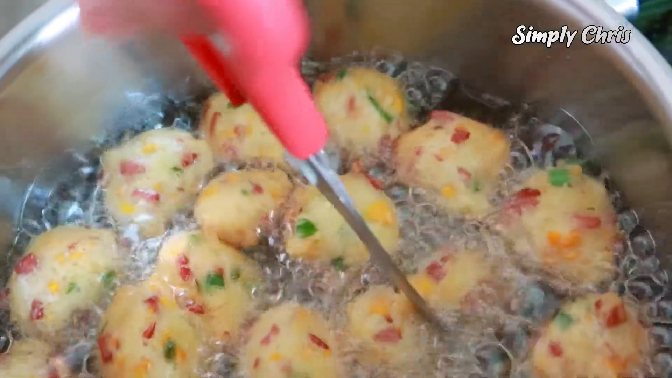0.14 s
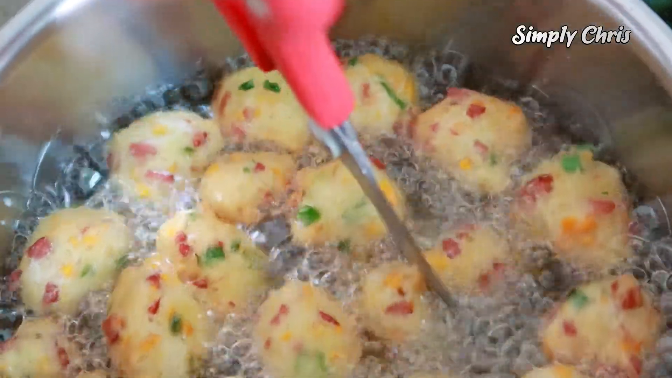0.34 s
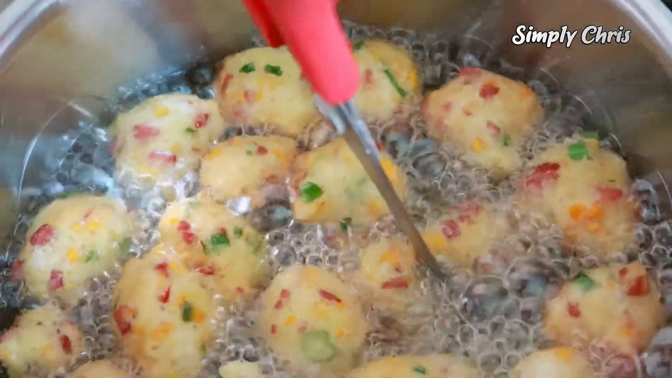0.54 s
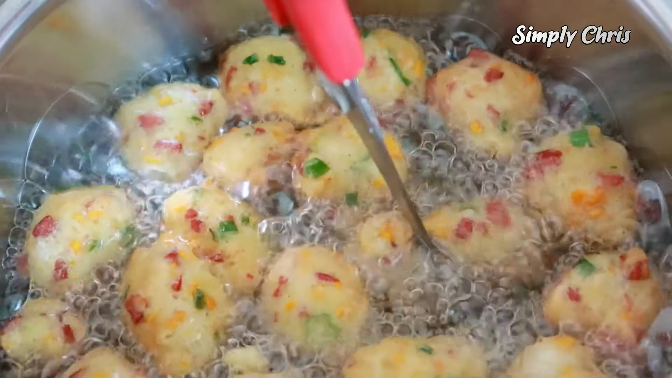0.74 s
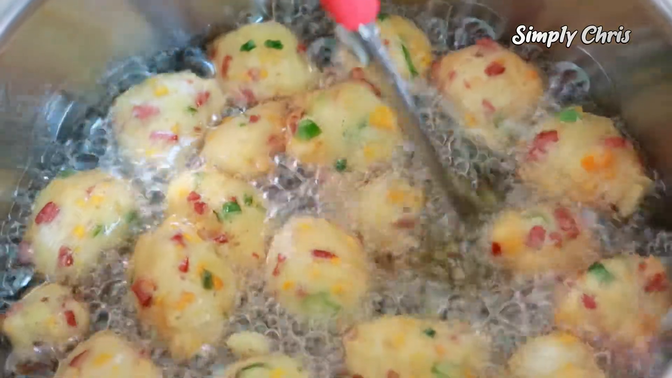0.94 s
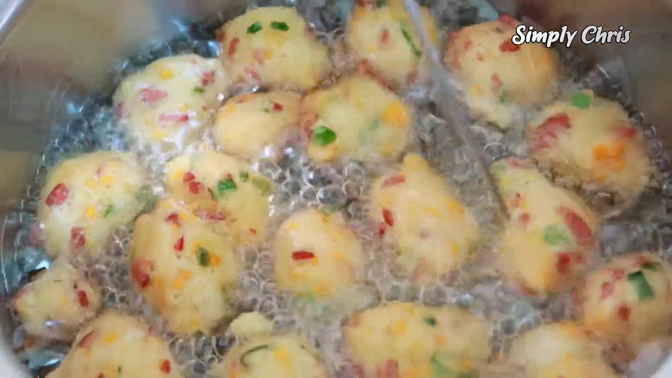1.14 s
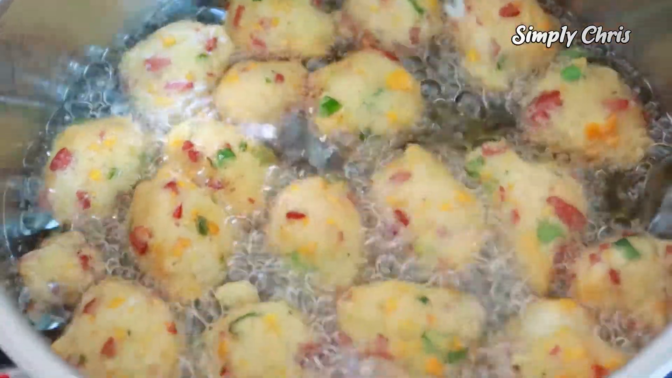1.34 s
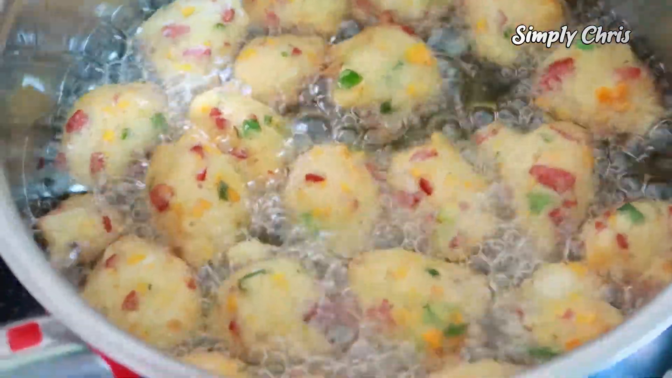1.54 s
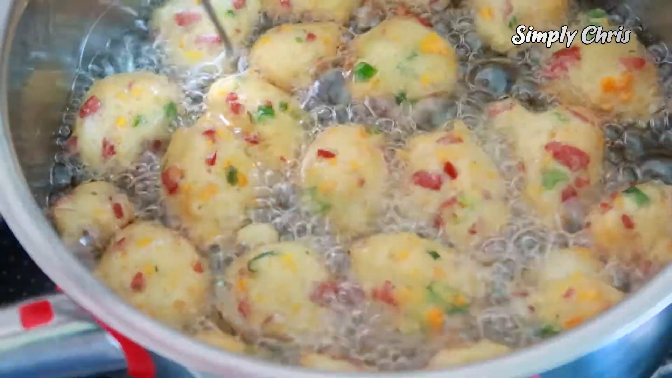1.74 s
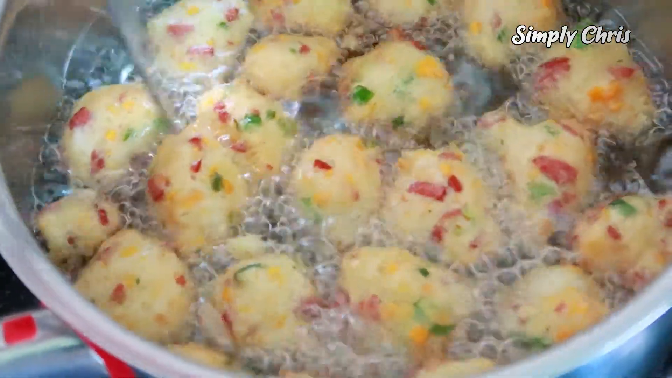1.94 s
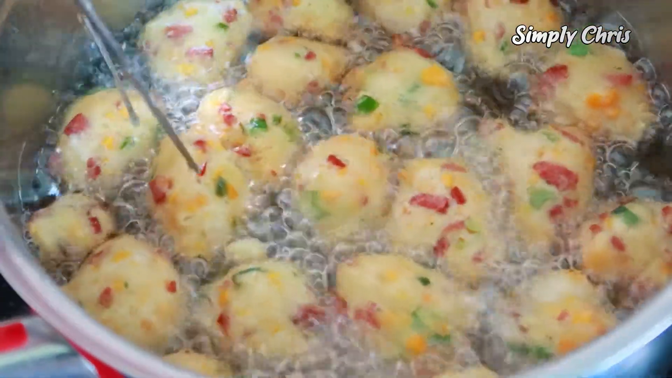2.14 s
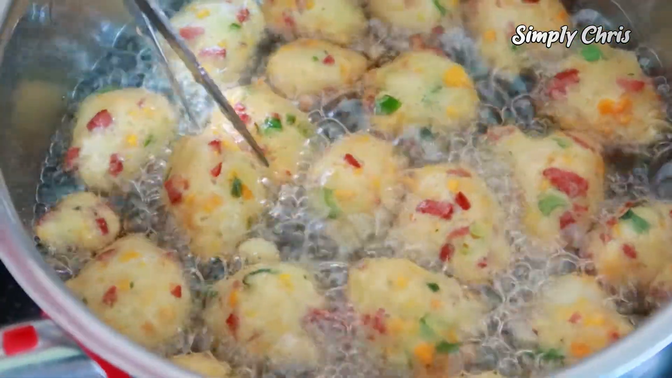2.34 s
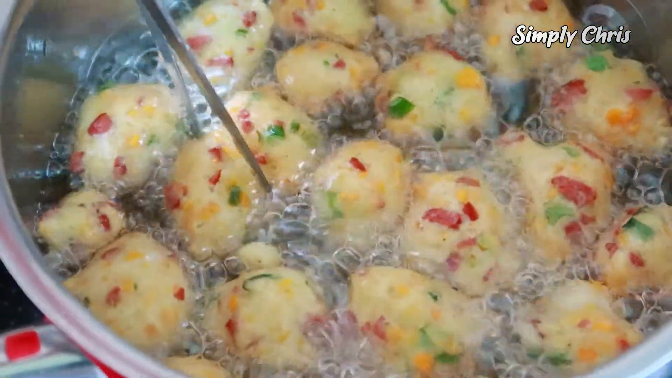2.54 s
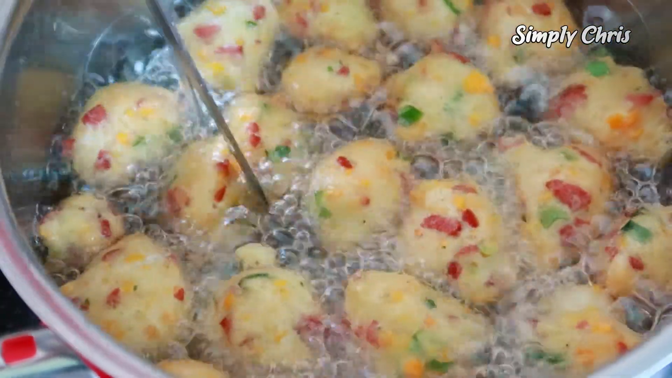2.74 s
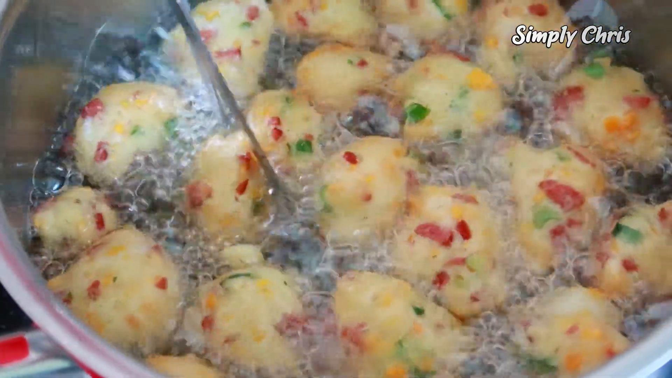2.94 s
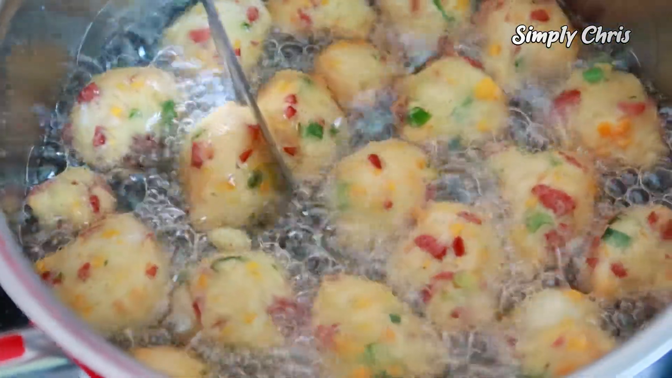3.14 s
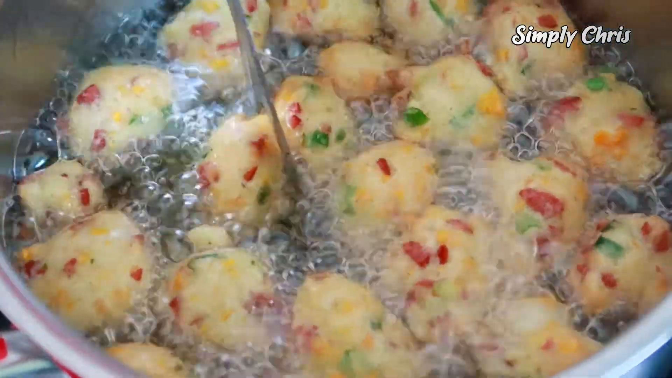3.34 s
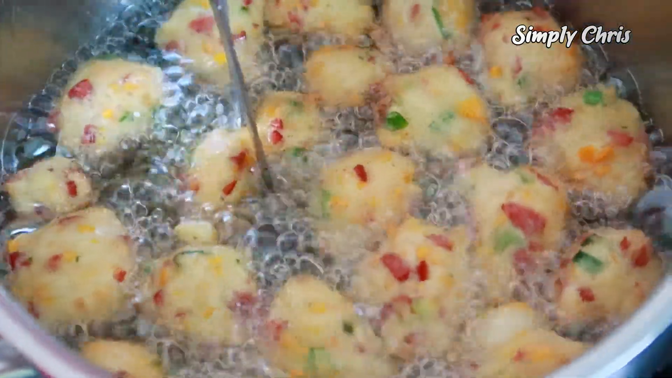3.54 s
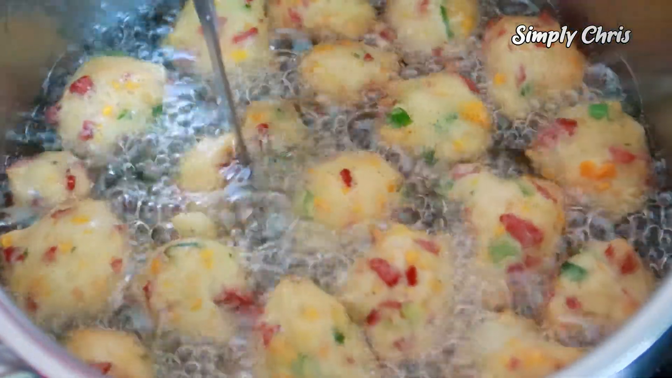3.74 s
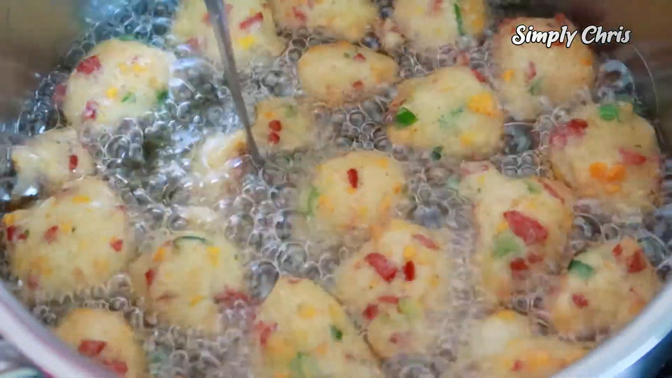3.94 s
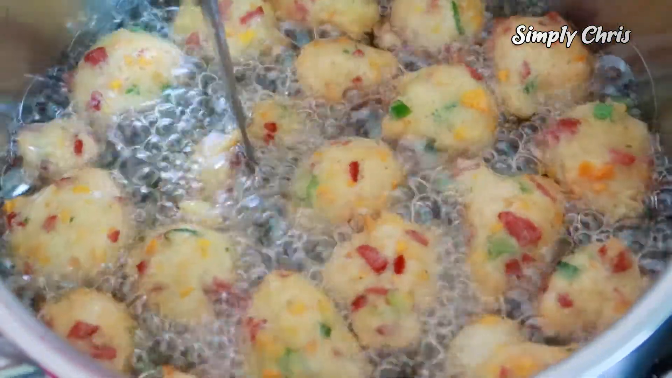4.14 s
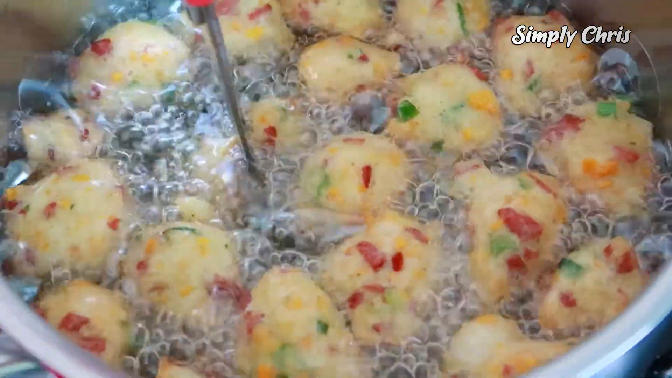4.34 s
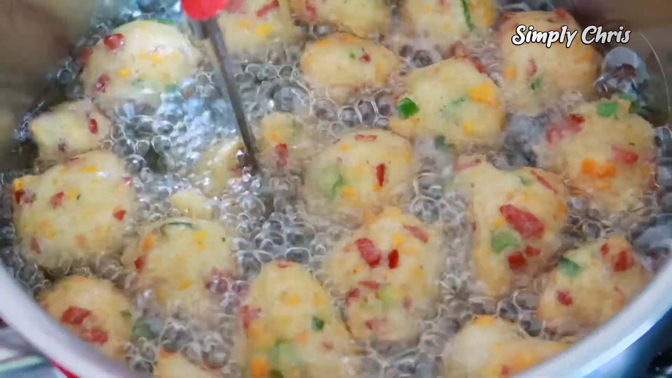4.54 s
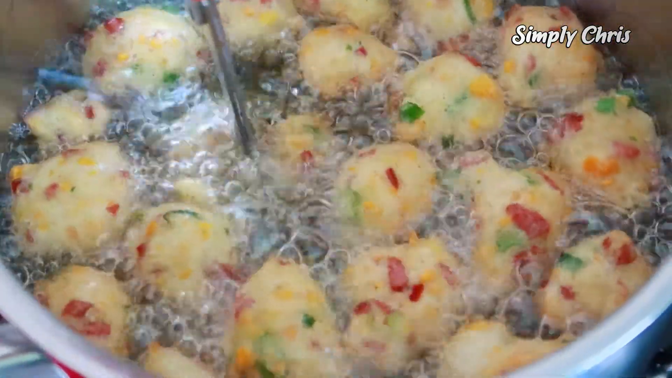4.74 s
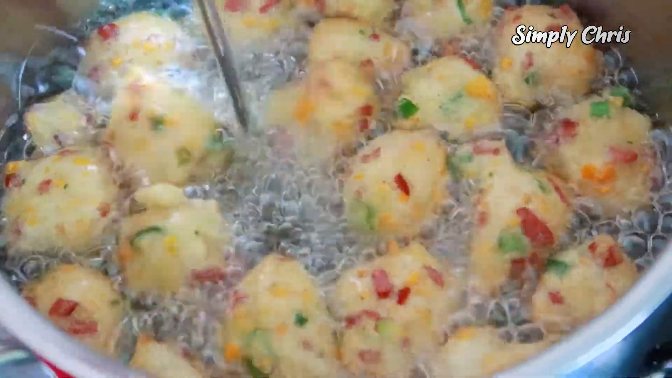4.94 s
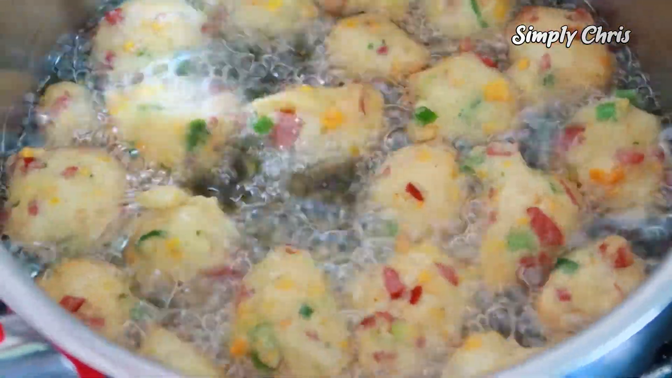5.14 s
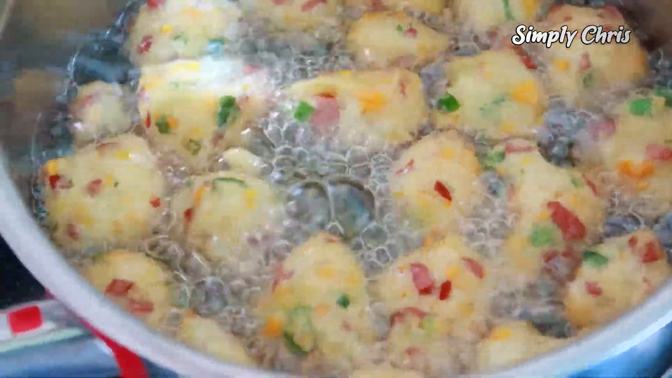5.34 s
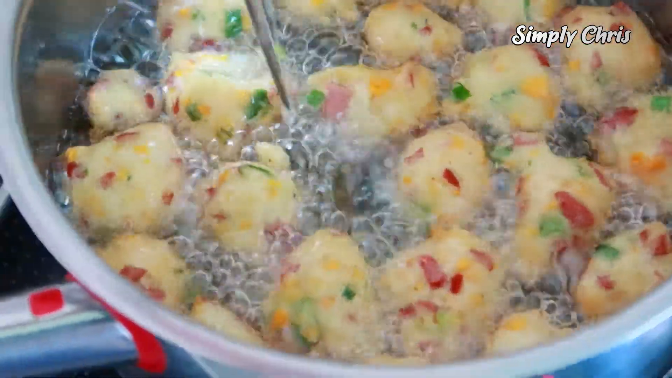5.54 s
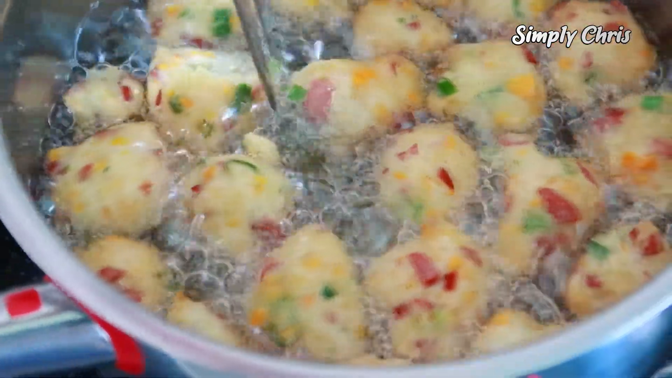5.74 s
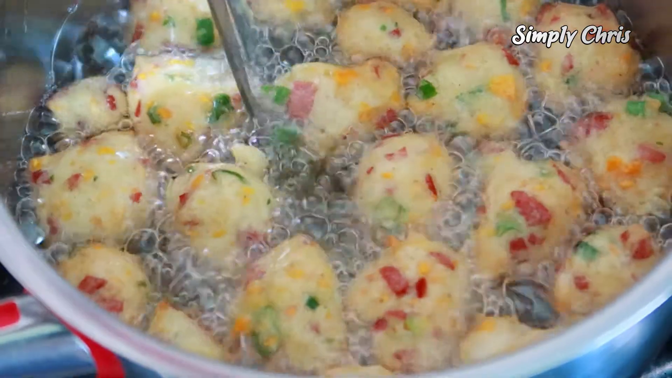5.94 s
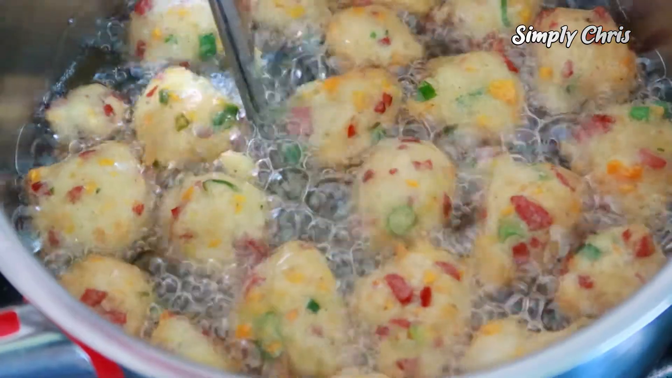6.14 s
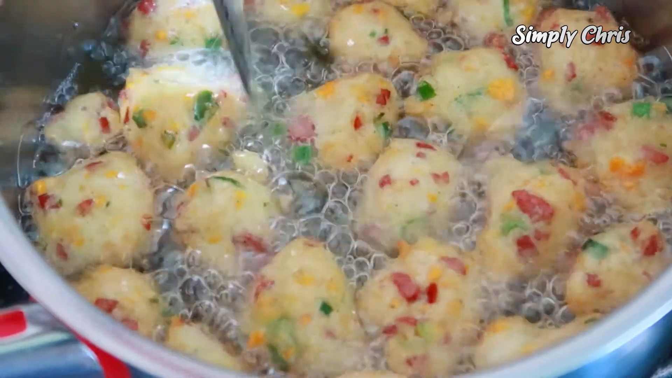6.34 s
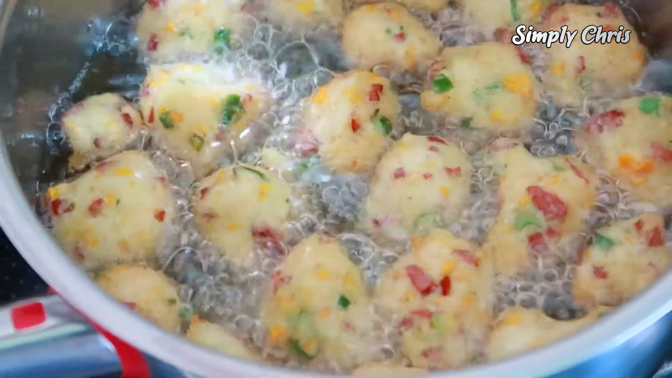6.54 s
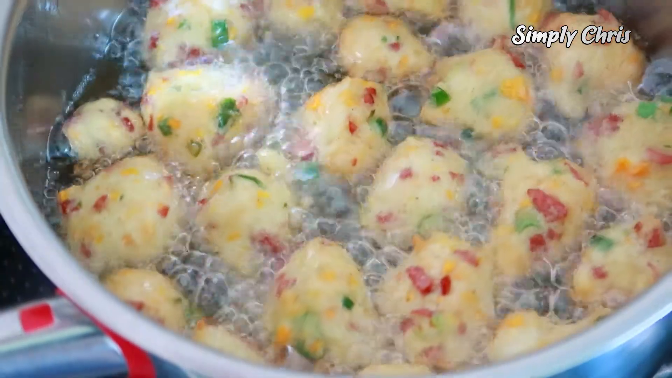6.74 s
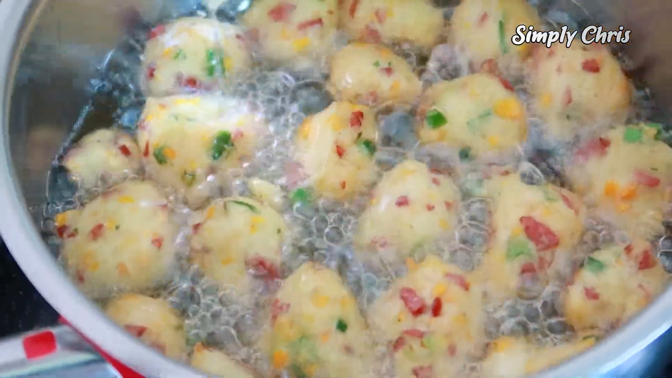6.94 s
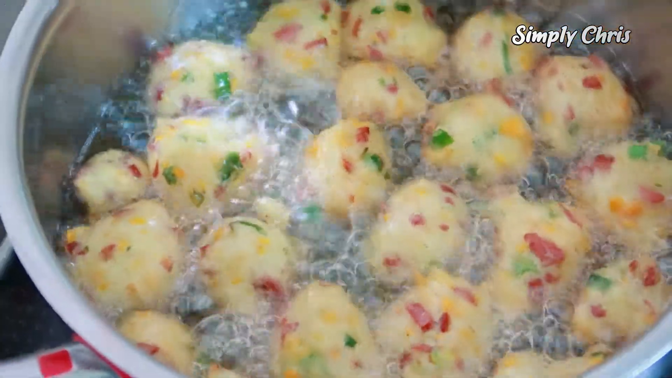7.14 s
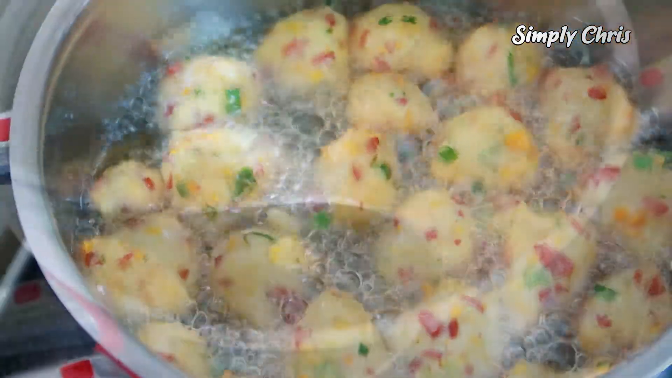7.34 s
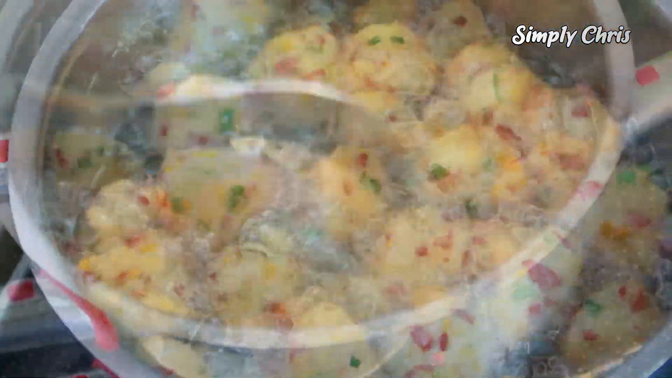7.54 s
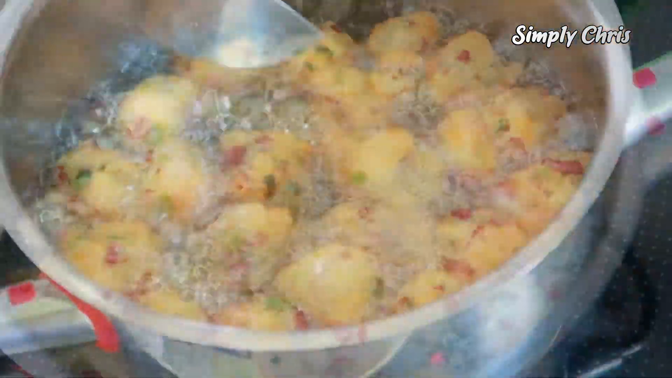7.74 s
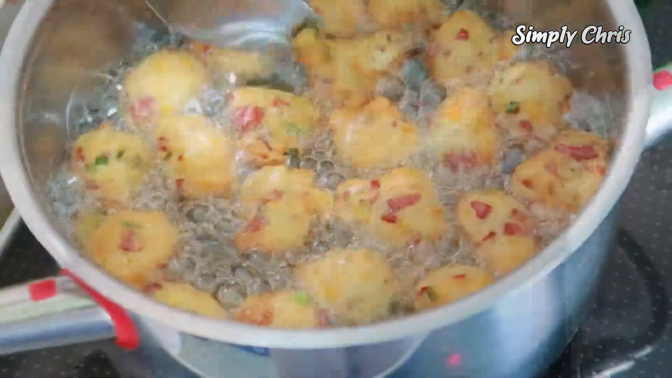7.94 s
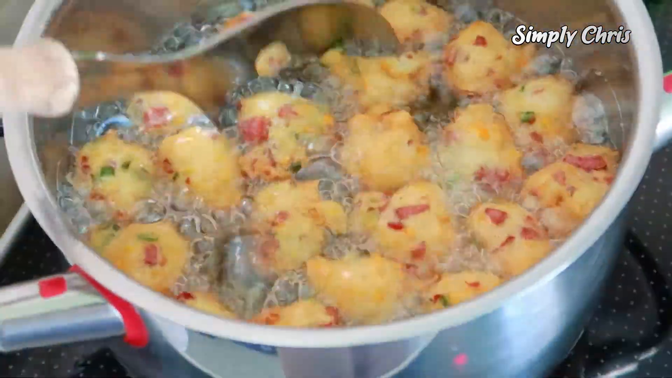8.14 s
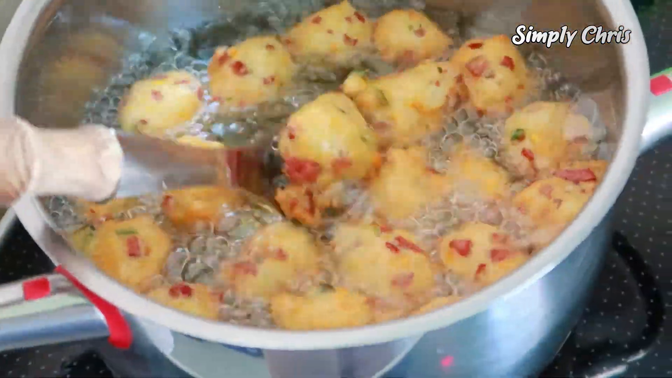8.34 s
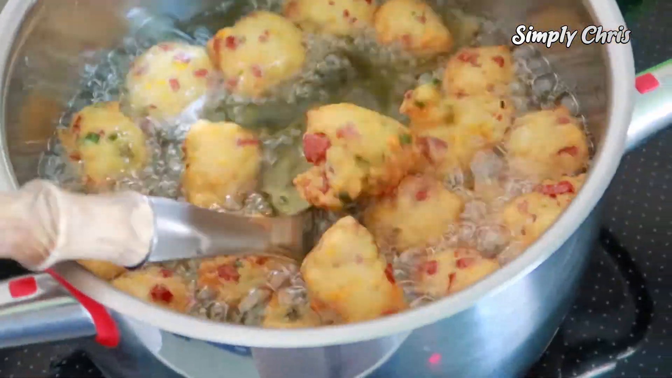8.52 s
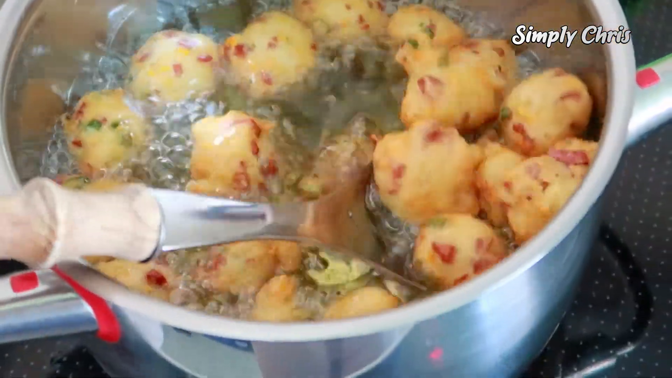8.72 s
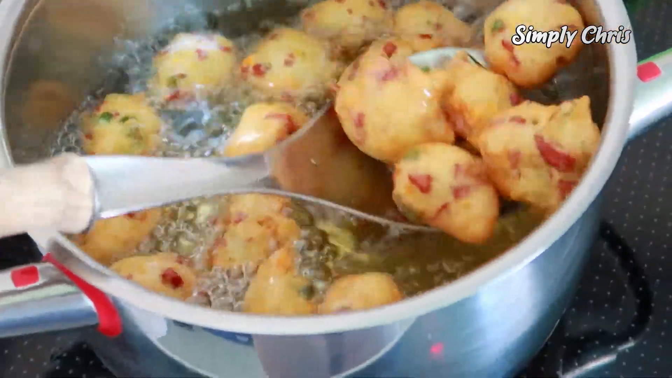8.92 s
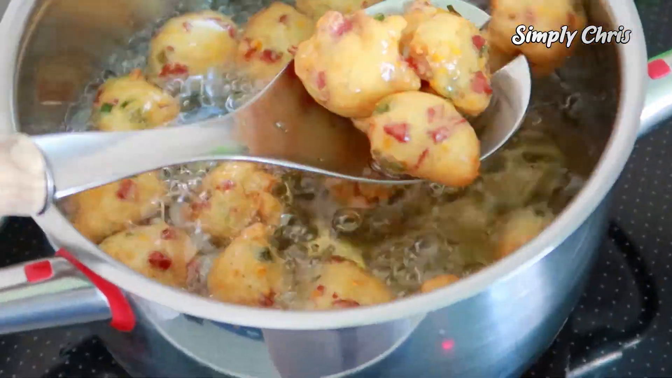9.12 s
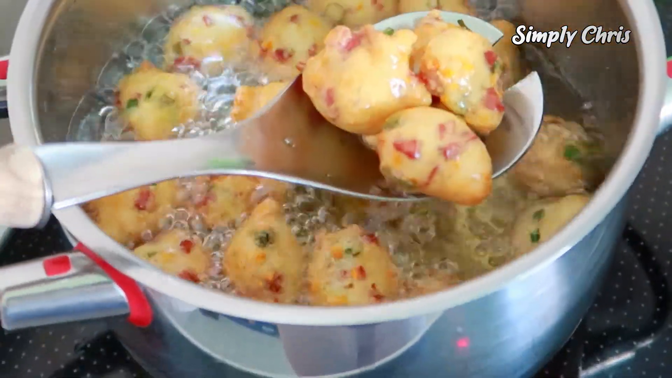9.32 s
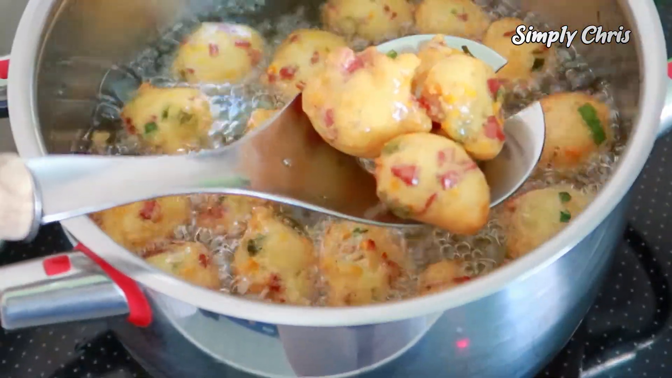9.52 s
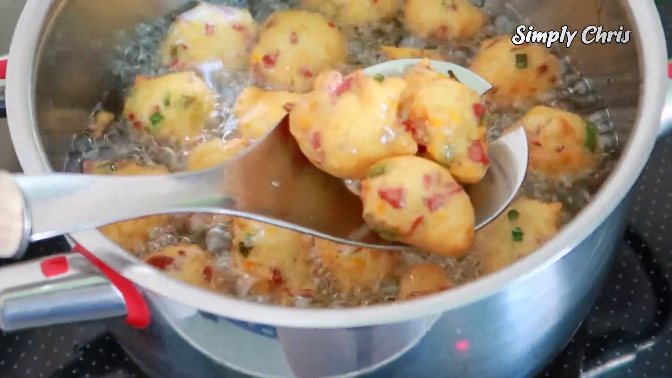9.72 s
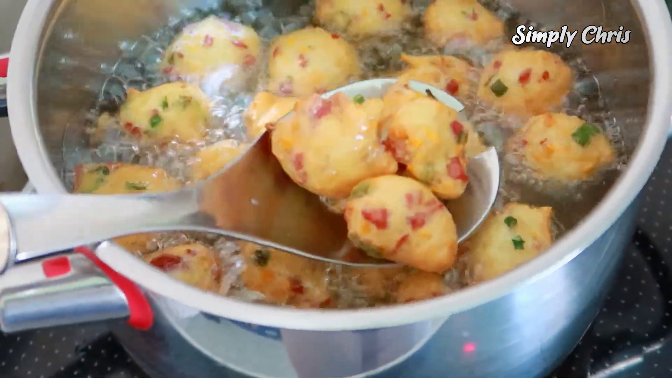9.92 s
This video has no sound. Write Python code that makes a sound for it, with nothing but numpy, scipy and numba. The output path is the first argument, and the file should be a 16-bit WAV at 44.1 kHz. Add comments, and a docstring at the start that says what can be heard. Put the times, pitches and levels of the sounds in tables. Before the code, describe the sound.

Close, constant frying fizz over a dull fan rumble, broken by small clicks, a few crisp bursts, and one loud pot clank near the end.

```python
"""Tools knock a steel pot, now and then throughout, over the sizzle of dough balls frying in hot oil.
Each knock rings the pot, thuds dully and stirs up a splash; the hob and worktop add a short rumble.
Steam bubbles fizz as thousands of tiny rings, with single blips, spitting droplets and popping water pockets.
Behind them a kitchen fan roars as shaped noise and hums. A small stereo microphone is close by."""
import sys
import numpy as np
from scipy import signal
from scipy.fft import rfft, irfft
from scipy.io import wavfile
from scipy.ndimage import uniform_filter1d, minimum_filter1d
from numba import njit

SR = 44100
rng = np.random.default_rng(int(sys.argv[2]) if len(sys.argv) > 2 else 0)


def dump(signal):
    """Clip the signal to [-1, 1] and save it as 16-bit WAV at the path in sys.argv[1]."""
    limited = np.clip(np.atleast_2d(signal).T, -1, 1)
    pcm = np.round(limited * 32767).astype(np.int16)
    wavfile.write(sys.argv[1], SR, pcm)


N = 440118  # samples
T = np.arange(N) / SR
HZ = np.maximum(np.fft.rfftfreq(N, 1 / SR), 1)

# Fan roar, its balance from low to high: f/Hz, relative level per Hz/dB
FAN_COLOUR = [(13, -55), (22, -38), (30, -31), (42, -2.5), (60, 4.5), (75, -6.5), (102, -3.5), (123, 0.5),
              (172, -4.5), (285, -4.5), (376, -2), (410, -2.5), (495, -7), (563, -16), (700, -12),
              (910, -12), (1540, -120)]
# Hum of the mains-driven fan motor: f/Hz, relative level/dB
MOTOR_HUM = [(50, -71), (58, -79), (100, -59), (150, -65.5), (200, -73.5), (299, -65)]
# Tool blows on the pot: t/s, relative level/dB, splash/dB, thud/dB, pitch struck hardest f/Hz,
# fall below that pitch/dB per octave, fall above it/dB per octave, weakest weighting of a mode/dB,
# share of the free ring time left by the tool resting on the pot, extra ring of the wall/dB
TOOL_BLOWS = [(0.019, -48, -34, -12, 450, 14, 6, -20, .5, 5),
              (0.042, -41, -38, -12, 430, 15, 5, -24, 0.54, 4),
              (0.064, -43.5, -33, -15, 600, 6, 9.9, -25, 0.65, 8.5),
              (0.425, -41, -31, 1, 940, 1.6, 7.2, -20, 0.47, 6),
              (0.777, -47, -28, -8, 460, 18, 5.5, -22, .4, 5),
              (0.797, -38.5, -34, -13, 460, 18, 4.6, -22, 0.4, 4.5),
              (0.822, -41.5, -27, -8, 470, 14, 8, -22, 0.63, 8),
              (0.832, -40, -28, 1, 950, 5, 7, -22, 0.25, 8),
              (0.846, -45, -23, -16, 473, 23, 7.1, -22, 0.52, 5),
              (0.873, -49, -15, -10, 1200, 6.5, 9, -22, 0.35, -3),
              (3.967, -35.5, -38, 6.5, 385, 11, 5.4, -35, 0.65, 1.5),
              (4.658, -45, -29, 4, 900, 2.7, 8, -22, 0.6, -8),
              (4.676, -48, -26, -2, 350, 5, 3.3, -22, 0.54, -8),
              (4.688, -47, -24, -3, 1000, 3, 6, -22, 0.44, -8),
              (4.732, -43, -28, -5, 1100, 14, 14, -21, 0.26, -5),
              (4.7746, -38, -25, 11, 230, 6, 4, -20, 0.74, -19),
              (4.785, -37.5, -31, 3, 220, 4.5, 5.1, -22, 0.78, -15),
              (8.304, -25.5, -42, -7, 204, 1, 9, -33, 0.87, 2.5),
              (8.717, -32, -23, -2, 1100, 2, 5.2, -13.5, 0.98, 1.5),
              (8.789, -44.5, -20, -10, 1000, 6.1, 2.4, -18, 0.48, -4),
              (8.818, -53, -30, -10, 900, 10, 10, -20, 0.47, -4),
              (9.109, -49, -32, -4, 1530, 5.8, 13, -13, 0.97, 3)]
# Ways the pot rings on its hob: f/Hz, relative level/dB, free ring time for a 60 dB fall/s
POT_MODES = [(96, -19, 0.16), (135.5, -7, 0.19), (198, -3, 0.21), (222, 4, 0.066), (281, -17, 0.17),
             (302, -5, 0.15), (378, -3, 0.15), (415, -1.5, 0.29), (455, -6.5, 0.089), (816, -5, 0.1),
             (895, 3.5, 0.077), (947, 0, 0.13), (1068, 0.5, 0.13), (1104, 2, 0.13), (1355, -0.5, 0.13),
             (1565, -2, 0.06), (1776, 0, 0.062), (2450, 13, 0.026), (3165, 12, 0.025), (4550, -27, 0.0079),
             (5940, 16, 0.037), (7250, 0, 0.014), (9200, 19.5, 0.018), (10000, -2, 0.01)]
# The tool strikes, chatters and rattles back: delay t/s, relative level/dB
TOOL_CONTACTS = [(0, -3.5), (.0007, -6.5), (.0024, -4.5), (.013, -20)]
# Dull body of tool and hand: f/Hz, relative level/dB, time for a 60 dB fall/s
DULL_BODY = [(112.4, -19.5, 0.29), (171, -3.5, 0.049), (210, 5, 0.058), (305, 3.5, 0.05), (588, 0.5, 0.065),
             (714, -2, 0.059), (1217, 6, 0.031), (1434, 8, 0.031)]
# Water pockets bursting: t/s, relative level of main ring/dB, left minus right/dB, splash/dB,
# coarsest splash f/Hz, finest splash f/Hz, low ring f/Hz, low ring/dB, main ring f/Hz,
# companion ring f/Hz, companion ring/dB, tilt of upper rings/dB per octave, sharpness of crack/dB, thump/dB
WATER_BURSTS = [(0.8981, -7, 3, -37.5, 800, 8100, 780, -8, 2350, 2930, -6, -2, 7, -33),
                (4.7732, -16.5, 2.5, -35.5, 870, 5040, 830, -5.5, 2370, 2700, -4, -3.5, 6.5, -18),
                (6.272, -15.5, 2, -34.5, 1000, 5800, 1160, -1, 2410, 2720, -3.5, 1, -13, -22),
                (8.9518, -20, 0, -29.5, 945, 10000, 930, -8, 1800, 2470, -23, 4.5, -3, -30)]
# Upper rings of a usual burst: f/Hz, relative level/dB, time for a 60 dB fall/s, share in the crack (1 = all)
BURST_UPPER_RINGS = [(4620, -1, 0.0083, 0), (7040, -5, 0.0065, 0.54), (7580, 4.5, 0.0031, 0.66),
                     (8360, -5, 0.0055, 0.69), (9650, -12.5, 0.014, 0.4), (11500, -13, 0.012, 0.23),
                     (13100, -5, 0.0024, 0.27)]
# Spitting droplets, and at 8.9592 s the bounce of the last burst:
# t/s, relative level/dB, middle pitch f/Hz, spread of pitch f/Hz, left minus right/dB
SPITS_AND_BOUNCE = [(1.108, -34, 3000, 2000, 0), (1.1275, -31, 12100, 2110, 1),
                    (2.755, -29.5, 9300, 5200, -3), (2.9431, -30, 10100, 3100, -1),
                    (3.3965, -25, 7700, 1500, 1), (3.6984, -33.5, 3500, 700, 2),
                    (3.7383, -29, 13000, 2800, 0), (3.857, -36, 4100, 1200, -1),
                    (4.0489, -34, 10600, 4100, 2), (4.438, -26.5, 6200, 4970, 1), (4.7, -34, 6900, 4000, 0),
                    (5.064, -33, 3020, 1000, 0), (5.0894, -30, 11800, 2400, -1), (5.17, -30, 3630, 2180, 0),
                    (5.678, -28, 8100, 3420, 2), (6.292, -34, 3820, 300, 0), (6.448, -28.5, 3900, 2800, 4),
                    (6.9942, -24, 3670, 4840, 7), (8.3301, -32, 6460, 4500, 0),
                    (8.9592, -19, 9100, 8160, 0), (9.28, -29, 2850, 2980, -2),
                    (9.3893, -28.5, 7400, 2010, -1)]
# Wet dough meeting the oil: t/s, relative level/dB, coarsest bubble f/Hz, finest bubble f/Hz, fade/s
DOUGH_FLURRIES = [(0.404, -61, 1800, 3500, 0.023), (1.108, -54.5, 2300, 4800, .12),
                  (1.235, -61, 2700, 3700, .03), (2.5, -60, 2770, 4000, 0.055),
                  (5.06, -58, 2600, 4000, 0.19), (6.551, -64, 2700, 3500, .2),
                  (9.282, -60.5, 1500, 4500, 0.033)]
# Levels of the frying and the fan over time; both dip near 7.67 s:
# t/s, fizz level/dB, boil (swell of mid-sized bubbles)/dB, level of the fan roar/dB, treble level/dB
FRYING_AND_FAN_LEVELS = [(0, 1.5, -1, 1, -2), (.3, 1, -1, -1, 1.5), (.75, 0, 0.5, 1, 1),
                         (1.05, 0, 4, 0, -0.5), (1.17, 0.5, -1.5, 1, 3), (1.45, 1.5, 2, 0.5, -1.5),
                         (1.8, 0.5, -2, 0, 4), (2.55, 0.5, 1, 0.5, 0.5), (3.4, 0.5, 0, 0.5, 1),
                         (4.3, 1, -1.5, 1, 2.5), (4.72, 0, -1.5, 2, 1.5), (5.16, 1.5, 2.5, 1, 0),
                         (5.6, 1.5, 2, 0.5, 1), (6.05, 0, -0.5, 1, 5), (6.85, 1, 2.5, 0.5, 0.5),
                         (7.18, 1, 0, 0, 1.5), (7.67, -1.5, -2, -1.5, -0.5), (8.1, 0, 0, 1, 0.5),
                         (8.4, 1, -1, 2, 0.5), (9.0, 1, -1, 0.5, 2.5), (9.98, 0, -3, -1.5, 2.5)]
# Fizz, its balance from low to high: f/Hz, relative level per Hz/dB
FIZZ_COLOUR = [(290, -30), (500, -6), (570, -20), (933, 3), (1050, -5), (1440, -5.5), (1550, -1.5),
               (1950, -5.5), (2810, -5.5), (3340, -7.5), (3810, -3.5), (6700, -9), (12700, -17),
               (14900, -27), (16000, -73)]
# Resonances of the air in the pot: f/Hz, width f/Hz, usual boost/dB
POT_AIR = [(1000, 103, 2.5), (1197, 18, 7.5), (1585, 120, 3), (2944, 113, 4.5), (3600, 100, 0.5)]

PORT_LAG_S = 4e-5  # lag between the two microphone ports for a place of 1
HOB_T60_S, HOB_DB = 0.3, -8
DROPS, DROP_SCATTER_DB = 1500, 1.8  # droplets in each splash, and how unevenly loud they are
SCATTER, SCATTER_PER_KHZ = 0.0024, 0.0356  # scatter of mode pitches, as fractions; it grows above 1 kHz
WALL_LOW_HZ, WALL_HIGH_HZ = 390, 490
USUAL_POP_HZ, FOLLOW = 2440, 0.63  # upper rings follow a pocket's pitch by this power
THUMP_HZ = 420
THUMP_T60_S, LOW_T60_S, MAIN_T60_S, TWIN_T60_S = 0.022, 0.01, 0.011, 0.0096
BLIPS, BLIP_DB, BLIP_PER_BOIL = 1200, -53.5, 1.4  # count, base level, dB for each dB of boil
BLIP_HZ, BLIP_SPREAD = 3124, 0.203  # middle pitch, and spread of its natural logarithm
BUBBLES = 400000
HOLLOW_WANDER_DB = 1.2
TILT_DB, TILT_PER_BOIL = 1, 1  # treble tilt at an even boil, and its rise for each dB of harder boil
FIZZ_DB, FAN_DB = -49, -50
TOP, SQUEEZE = 0.4, 0.25  # gain control: threshold amplitude, dB cut for each dB over it
HOLD_S, SLEW_S = 0.197, 0.0059
TOP_HZ = 15600


def undb(db):
    """Turn decibels into an amplitude factor."""
    return 10 ** (np.asarray(db) / 20)


def unit(x):
    """Scale a sound to an average (rms) strength of 1."""
    return x / np.sqrt(np.mean(x ** 2))


def colour(x, points, extra_db=0):
    """Shape a broad sound by (Hz, dB) points, then scale it to unit strength."""
    hz, db = np.transpose(points)
    gain_db = np.interp(np.log(HZ), np.log(hz), db) + extra_db
    return unit(irfft(rfft(x) * undb(gain_db), N))


def walk(rate):
    """Random levels held 1 / rate s and smoothed twice; spread near 1."""
    k = int(SR / rate)
    steps = np.repeat(rng.standard_normal(N // k + 1), k)
    return 1.495 * uniform_filter1d(uniform_filter1d(steps, k), k)[:N]


@njit
def rings(ring_list, n):
    """Add up decaying rings in two channels: (s, Hz, t60, left gain, right gain, lag phase, rise s)."""
    out = np.zeros((2, n))
    for s, hz, t60, left, right, lag, rise in ring_list:
        # each sample turns the ring a little further and shrinks it
        p = np.exp((2j * np.pi * hz - np.log(1000) / t60) / SR)
        turn, z, start = np.exp(1j * lag), 1 + 0j, int(s * SR)
        for i in range(start, min(n, start + int(t60 * SR))):
            soft = min(1., (i - start + 1) / (rise * SR + 1))
            out[0, i] += soft * left * (z * turn).imag
            out[1, i] += soft * right * (z / turn).imag
            z *= p
    return out


def rows(s, hz, t60, db, pan_db, place, rise):
    """List one ring per entry; place, from side to side of the pot, sets the lag between the ports."""
    hz = np.minimum(hz, .45 * SR)
    left, right = undb(db + pan_db / 2), undb(db - pan_db / 2)
    lag = np.pi * hz * PORT_LAG_S * place
    columns = np.broadcast_arrays(s, hz, t60, left, right, lag, rise)
    return np.stack([c.ravel() for c in columns], axis=1)


def fan(level_db):
    """Low roar of the hood fan, nearly alike at both ports, with the motor's wavering hum."""
    mid = colour(rng.standard_normal(N), FAN_COLOUR)
    # the lowest notes differ least between the ports
    side = colour(rng.standard_normal(N), FAN_COLOUR, -24.0 / (1 + (HZ / 70) ** 2))
    roar = mid + undb(-8.0) * side * np.array([[1], [-1]])
    hum = 0
    for hz, db in MOTOR_HUM:
        strength = undb(db + 1.5 + walk(2.9))
        pitch = hz * (1 + 0.00568 * walk(6))
        hum = hum + strength * np.sin(2 * np.pi * np.cumsum(pitch) / SR)
    return roar * undb(level_db + 1.0 * walk(2.994)) + hum


def hob(x):
    """Hob and worktop carry each knock on as a short rumbling wash, partly shared by both ports."""
    t = np.arange(SR // 2) / SR
    envelope = undb(-60 * t / HOB_T60_S) * np.minimum(1, t / 0.0018)
    mid, side = rng.standard_normal((2, len(t))) * envelope
    tail = np.array([mid + 0.075 * side, mid - 0.082 * side])
    return undb(HOB_DB) * signal.fftconvolve(x, tail / np.sqrt(np.sum(mid ** 2)), axes=1)[:, :N]


def splash(s, db, low_hz, high_hz, fade_s):
    """A swarm of droplets or bubbles, each a brief ring, thinning and fading."""
    late, size, loud, place = rng.random((len(s), DROPS, 4)).transpose(2, 0, 1)
    late = -fade_s * np.log(late + 1e-9)
    hz = low_hz * (high_hz / low_hz) ** size
    scatter_db = -DROP_SCATTER_DB * np.log(loud + 1e-9)
    db = db + 8.8 * np.log10(hz / low_hz) + scatter_db - 4.9 * late / fade_s
    return rows(s + late, hz, 0.0051 + 5.0 / hz, db, 0, 2 * place - 1, 0.52 / hz)


def knocks():
    """Each blow and rebound rings the same pot modes, strongest about one pitch, over a dull thud."""
    blows = np.array(TOOL_BLOWS).T[:, :, None]
    s, db, splash_db, thud_db, centre_hz, below_db, above_db, floor_db, share, wall_db = blows
    hz, mode_db, t60 = np.transpose(POT_MODES)
    # where the blow lands sets which modes ring most
    octaves = np.log2(hz / centre_hz)
    slope_db = np.where(octaves < 0, below_db, -above_db) * octaves
    wall = (hz > WALL_LOW_HZ) & (hz < WALL_HIGH_HZ)
    weight_db = np.maximum(slope_db, floor_db) + wall_db * wall
    delay, rebound_db = np.transpose(TOOL_CONTACTS)[:, :, None, None]
    chance = rng.standard_normal((len(s), len(TOOL_CONTACTS), len(hz), 3))
    late, loud_db, shift = chance.transpose(3, 1, 0, 2)
    # each contact's mode pitches are scattered at random, which roughens the ring
    scatter = SCATTER + SCATTER_PER_KHZ * np.clip(hz / 1000 - 1, 0, 3)
    when = s + delay + 0.00019 * abs(late)
    ring_db = db + rebound_db + weight_db + mode_db + loud_db + 3.5
    ring = rows(when, hz * (1 + scatter * shift), t60 * share, ring_db, 0, 0.8, 0.0028)
    body_hz, body_db, body_t60 = np.transpose(DULL_BODY)
    thud = rows(s, body_hz, body_t60, db + thud_db + body_db, 0, .38, 0.0096)
    return np.concatenate([ring, thud, splash(s, db + splash_db, 670.0, 7840.0, 0.046)])


def pops():
    """A bursting water pocket rings briefly at a few pitches; the lowest is a thump through the pot."""
    bursts = np.array(WATER_BURSTS).T[:, :, None]
    s, db, pan_db, splash_db, coarsest_hz, finest_hz = bursts[:6]
    low_hz, low_db, main_hz, twin_hz, twin_db, tilt_db, crack_db, thump_db = bursts[6:]
    upper_hz, upper_db, upper_t60, crack = np.transpose(BURST_UPPER_RINGS)
    upper_hz = upper_hz * (main_hz / USUAL_POP_HZ) ** FOLLOW
    upper_db = upper_db + tilt_db * np.log2(upper_hz / main_hz) + crack_db * crack
    hz = np.hstack([THUMP_HZ + 0 * s, low_hz, main_hz, twin_hz, upper_hz])
    ring_db = np.hstack([thump_db, low_db, 0 * s, twin_db, upper_db])
    t60 = np.r_[THUMP_T60_S, LOW_T60_S, MAIN_T60_S, TWIN_T60_S, upper_t60]
    burst = rows(s, hz, t60, db + ring_db + 2.0, pan_db, 0.51, 0.00025)
    return np.concatenate([burst, splash(s, db + splash_db, coarsest_hz, finest_hz, 0.026)])


def ticks():
    """Each spitting droplet, and the last burst's bounce, is nine quick rings spread about its pitch."""
    s, db, hz, spread, pan_db = np.array(SPITS_AND_BOUNCE).T[:, :, None]
    late, place = rng.random((len(s), 9, 2)).transpose(2, 0, 1)
    pitch = hz + spread * np.linspace(-.5, .5, 9)
    return rows(s + .00008 * late, pitch, 0.015, db - 14, pan_db, 2.0 * place - .75, 0.000091)


def flurries():
    """Wet dough meeting the oil sets off a swarm of mid-sized bubbles that thins out."""
    s, db, low_hz, high_hz, fade_s = np.array(DOUGH_FLURRIES).T[:, :, None]
    return splash(s, db, low_hz, high_hz, fade_s)


def blips(boil_db):
    """Larger bubbles ring out singly above the fizz, louder when the oil boils hard."""
    when, loud, place = rng.random((BLIPS, 3)).T
    hz = BLIP_HZ * np.exp(BLIP_SPREAD * rng.standard_normal(BLIPS))
    boil_now_db = boil_db[(when * N).astype(int)]
    db = BLIP_DB + BLIP_PER_BOIL * boil_now_db - 3.0 * np.log(loud + 0.054)
    return rows(when * N / SR, hz, 70 / hz, db, .25, 2 * place - 1, 4 / hz)


def fizz(level_db, tilt_db, swell_db):
    """Thousands of steam bubbles a second, each ringing for some tens of cycles; the pot's air colours them."""
    when, size, loud, place = rng.random((BUBBLES, 4)).T
    hz = 450 + 15500 * size ** 1.5
    # near equal energy per Hz before the colouring; a few bubbles are much louder than the rest
    db = 10 * np.log10(hz / 1000) - 1.46 * np.log(loud + 1e-9)
    spread_place = (2 * place - 1) * (1 + 1500 / hz)
    bubbles = rows(when * N / SR, hz, 0.0029 + 22.2 / hz, db, 0.25, spread_place, 1.76 / hz)
    plain = colour(rings(bubbles, N), FIZZ_COLOUR)
    # the froth shifts, so each resonance of the air comes and goes
    bed = plain
    for f, width, boost_db in POT_AIR:
        resonance = signal.lfilter(*signal.iirpeak(f, f / width, fs=SR), plain)
        bed = bed + (undb(boost_db + HOLLOW_WANDER_DB * walk(7)) - 1) * resonance
    high = signal.sosfilt(signal.butter(1, 6000, "high", fs=SR, output="sos"), bed)
    middle = signal.sosfilt(signal.butter(1, [2600, 3300], "band", fs=SR, output="sos"), bed)
    # the boil surges briefly, the finest and the mid-sized bubbles each at their own pace
    tilt_db = tilt_db + 0.5 * walk(14)
    swell_db = swell_db + 1.9 * walk(20)
    surging = bed + (undb(tilt_db) - 1) * high + (undb(swell_db) - 1) * middle
    return surging * undb(level_db + 0.9 * walk(16))


def scene():
    """Mix the fan, knocks, pops, droplets and frying as their levels change."""
    s, *columns = np.transpose(FRYING_AND_FAN_LEVELS)
    level_db, boil_db, fan_db, treble_db = (np.interp(T, s, c) for c in columns)
    roar = fan(FAN_DB + fan_db)
    blows = rings(knocks(), N)
    blows = blows + hob(blows)
    # a dip near 615 Hz, perhaps from the pot or microphone, hollows every knock
    blows = blows - 0.7 * signal.lfilter(*signal.iirpeak(615, 3.2, fs=SR), blows)
    spits = rings(np.concatenate([pops(), ticks(), flurries(), blips(boil_db)]), N)
    tilt_db = TILT_DB + TILT_PER_BOIL * boil_db + treble_db
    return roar + blows + spits + fizz(FIZZ_DB + level_db, tilt_db, boil_db)


def record(dry):
    """Turn down for a moment after a loud peak, round off the tops, cut the highest treble, add an offset."""
    hold = int(HOLD_S * SR)
    # the loudest level of the last moment, in either channel
    peak = -minimum_filter1d(-abs(dry).max(axis=0), size=hold, origin=(hold - 1) // 2)
    wanted_db = -SQUEEZE * 20 * np.log10(np.maximum(peak / TOP, 1))
    keep = np.exp(-1 / (SLEW_S * SR))
    cut_db = signal.lfilter([1 - keep], [1, -keep], wanted_db)
    rounded = np.tanh(dry * undb(cut_db))
    steep_cut = signal.ellip(8, .2, 70, TOP_HZ, fs=SR, output="sos")
    return signal.sosfilt(steep_cut, rounded) + .0003


dry = scene()
out = record(dry)
dump(out)
```